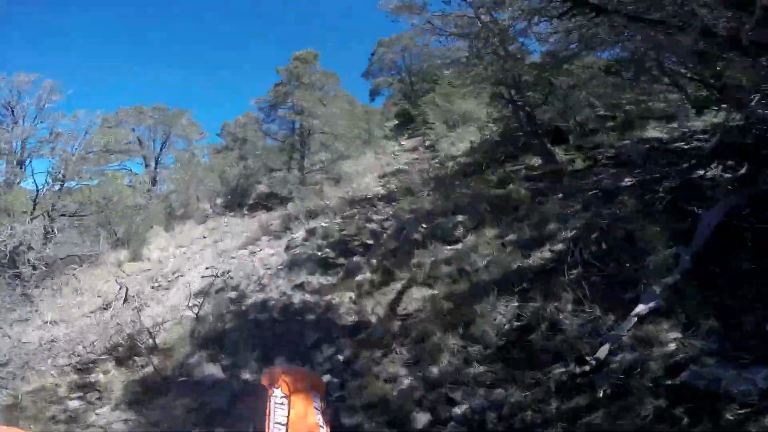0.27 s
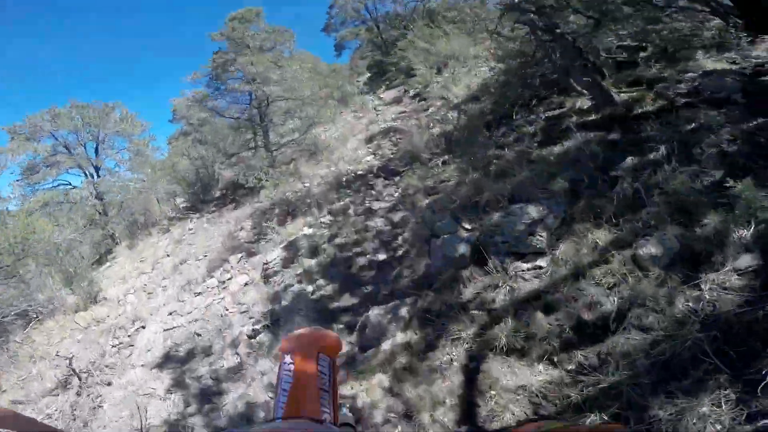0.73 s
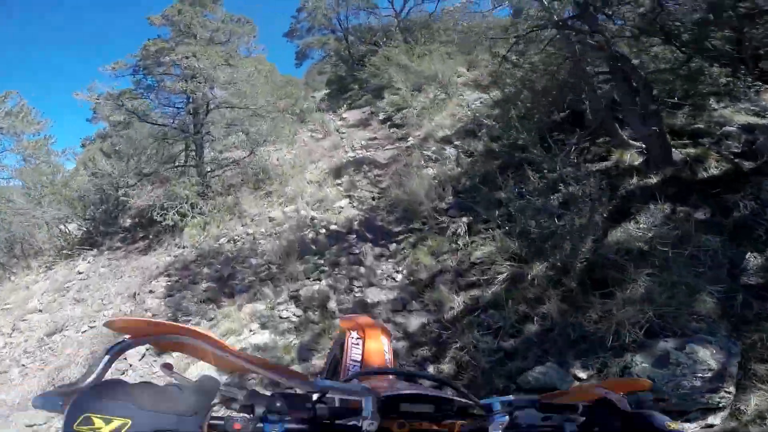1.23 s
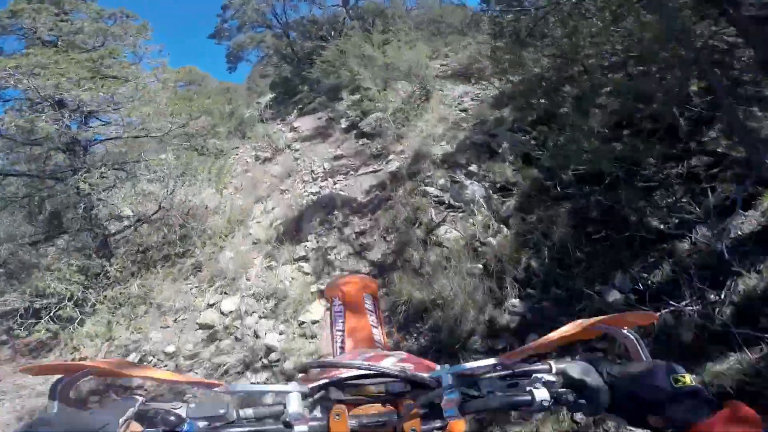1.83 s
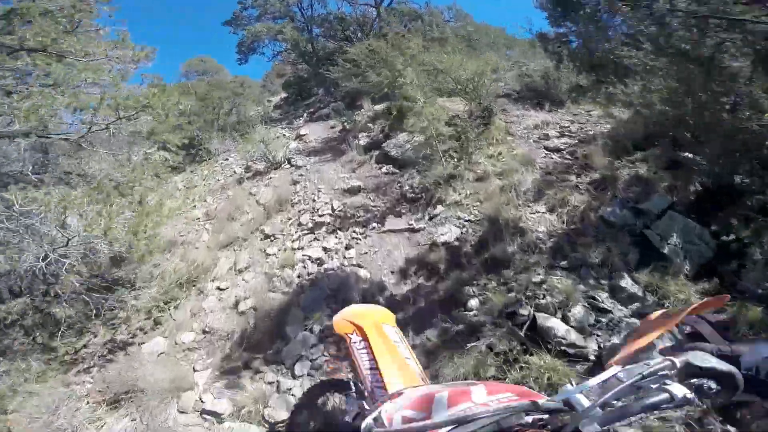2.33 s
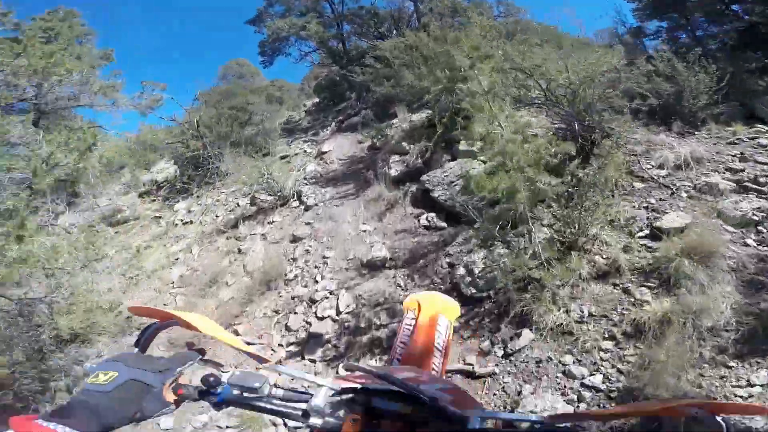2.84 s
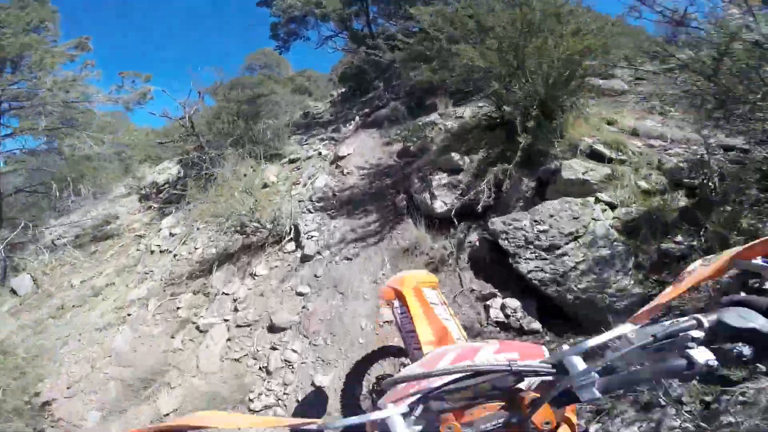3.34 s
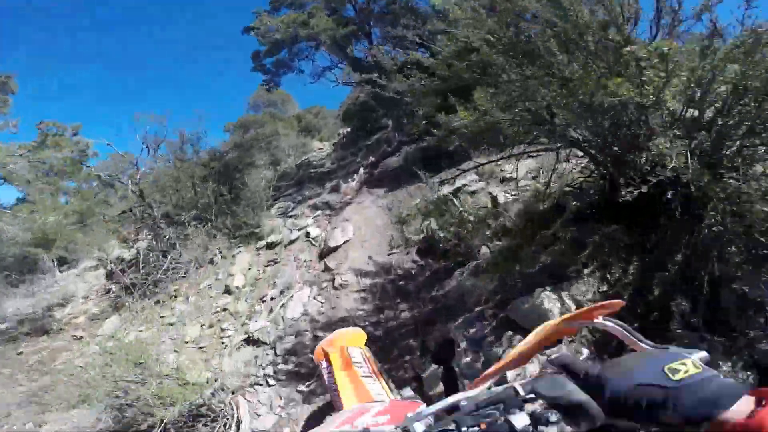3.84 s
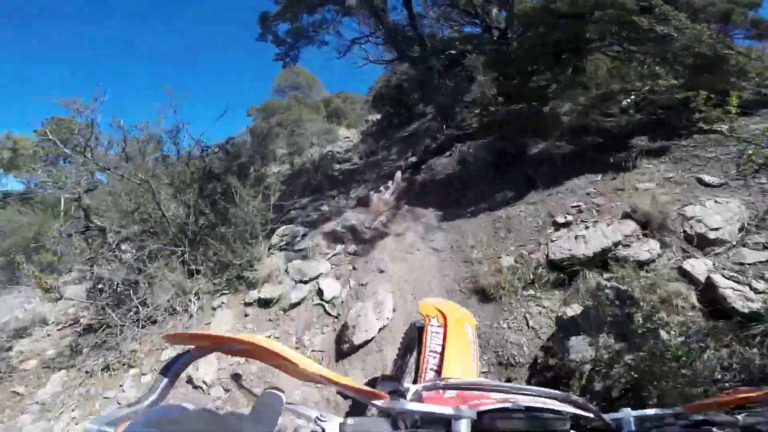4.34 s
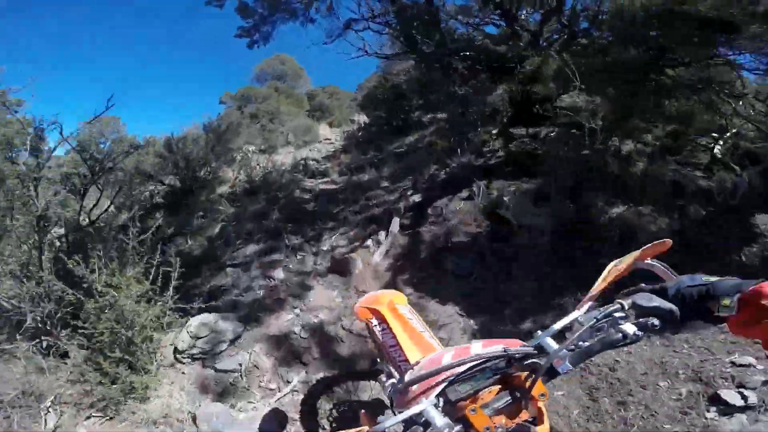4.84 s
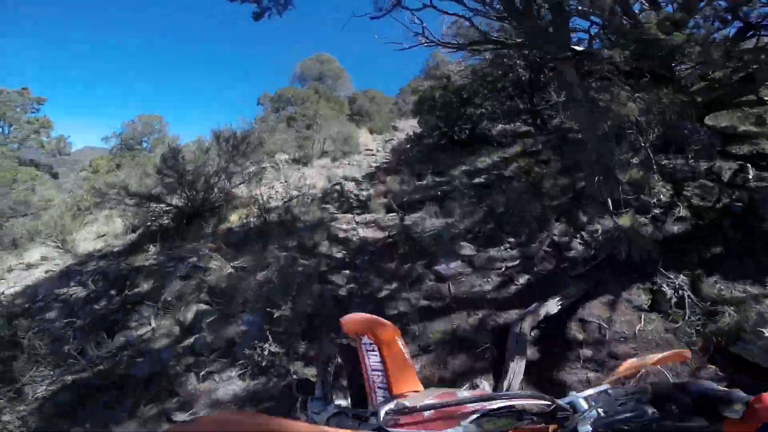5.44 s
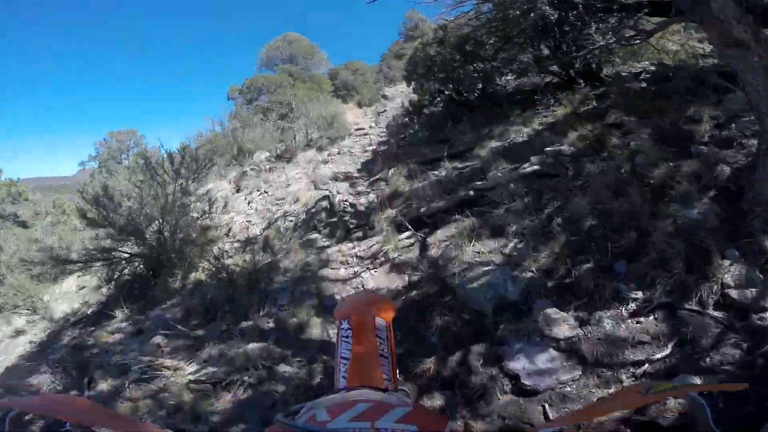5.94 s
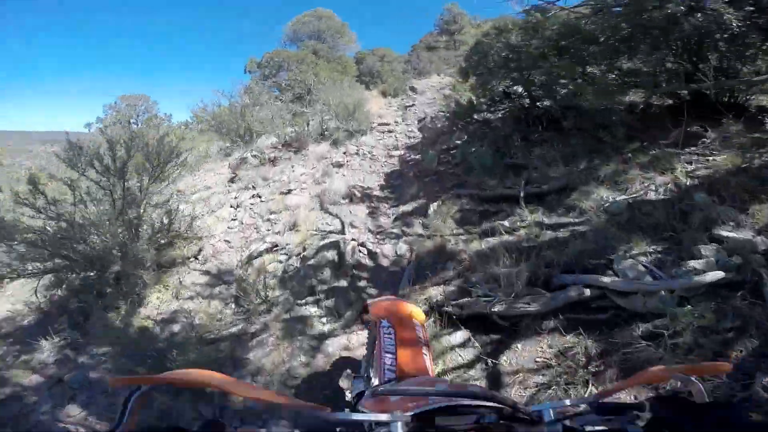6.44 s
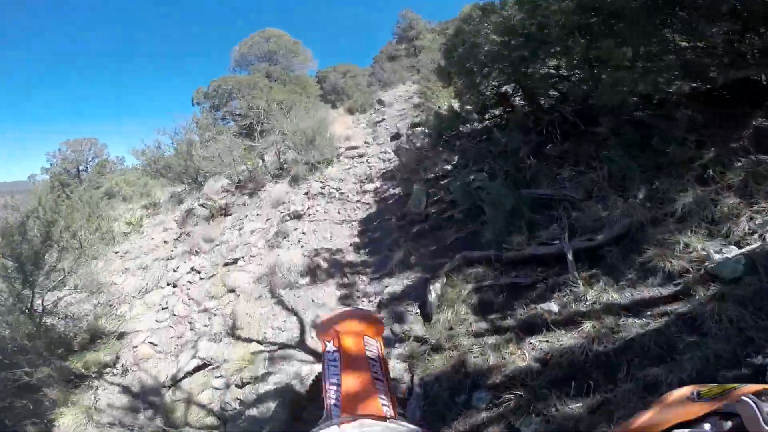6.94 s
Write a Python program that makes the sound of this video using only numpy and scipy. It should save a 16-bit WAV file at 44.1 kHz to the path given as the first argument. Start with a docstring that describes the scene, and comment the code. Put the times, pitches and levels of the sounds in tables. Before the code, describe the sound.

Close, raspy two-stroke motorcycle engine surges and sags uphill, popping as it picks up again, with clacks, thuds and a final rise in revs.

```python
"""A two-stroke dirt bike climbs a rocky slope in bursts of throttle, heard from the rider's helmet.
Each firing thumps through the exhaust, which booms, drones, growls and barks; gas rasps and the piston clatters in step.
Between bursts the engine coasts raggedly and catches with a pop; metal clacks and thuds, trail and twigs rustle.
One train of firing impulses drives filters for the exhaust, gas and piston; the gears are a phase-driven sine.
Clacks and pops are filtered blows, trail and twigs filtered noise, and a brief metallic singing two unsteady sines."""
import sys
import numpy as np
from scipy import signal
from scipy.fft import rfft, irfft, next_fast_len
from scipy.io import wavfile
from scipy.ndimage import uniform_filter1d, minimum_filter1d, map_coordinates

SR = 44100
rng = np.random.default_rng(int(sys.argv[2]) if len(sys.argv) > 2 else 0)


def pcm_store(signal):
    """Save signal as 16-bit PCM."""
    levels = np.round(np.clip(np.atleast_2d(signal), -1, 1) * 32767)
    wavfile.write(sys.argv[1], SR, levels.astype(np.int16).T)


N = 317079

# pipe's main resonance, broad when the engine runs freely: (frequency [Hz], relative level [dB])
DRONE_RESPONSE = [(60, -51), (135, -23), (175, -12.5), (210, -3), (238, 5), (272, 3), (300, 0), (335, -5.5),
                  (375, -13), (600, -48.5), (1500, -100)]


def amp(db):
    """Decibels to gain."""
    return 10 ** (np.asarray(db) / 20)


def unit(x):
    """Scale to rms 1."""
    return x / np.sqrt(np.mean(x ** 2) + 1e-20)


def even(x, size=3500):
    """Scale to rms 1 at every moment, over a few firings."""
    power = uniform_filter1d(uniform_filter1d(x ** 2, size), size)
    return x / np.sqrt(np.abs(power) + 1e-20)


def curves(rows):
    """One value per sample for each column after the time."""
    time_s, *columns = np.transpose(rows)
    return [np.interp(np.arange(N) / SR, time_s, column) for column in columns]


def swell(center_s, half_s):
    """A smooth Gaussian rise and fall around center_s."""
    return np.exp(-((np.arange(N) / SR - center_s) / half_s) ** 2)


def wobble(knots_per_s):
    """A smooth random curve, splined through normal random knots."""
    knots = rng.standard_normal(int(N * knots_per_s / SR) + 4)
    return map_coordinates(knots, [np.arange(N) * knots_per_s / SR])


def ring(x, response, spread_s_per_khz=0, size=16384):
    """Pass x through a causal minimum-phase body; the spread delays the highs."""
    hz, db = np.transpose(response)
    grid_hz = np.fft.rfftfreq(size, 1 / SR)
    log_gain = np.log(amp(np.interp(np.log(grid_hz + 1), np.log(hz), db)))
    # folding the cepstrum onto positive times gives minimum phase
    cepstrum = irfft(log_gain)
    cepstrum[1:size // 2] *= 2
    cepstrum[size // 2 + 1:] = 0
    chirp_rad = np.pi * spread_s_per_khz * grid_hz ** 2 / 1000
    impulse = irfft(np.exp(rfft(cepstrum) - 1j * chirp_rad))
    return signal.fftconvolve(x, impulse)[:len(x)]


def pulses(times_s, sizes):
    """Impulses, each shared between its two nearest samples."""
    at = np.clip(times_s * SR, 0, N - 2)
    i = at.astype(int)
    return np.bincount(i, sizes * (1 - at + i), N) + np.bincount(i + 1, sizes * (at - i), N)


def puffs(train, t60_s, steady):
    """Noise that flares at each impulse and dies down to a steady hiss."""
    t = np.arange(SR // 8) / SR
    flare = unit(signal.fftconvolve(train, amp(-60 * t / t60_s))[:N])
    return unit((flare + steady) * rng.standard_normal(N))


def bursts(times_s, peaks_db, response, attack_s, t60_s, noisy):
    """Short blows with a noisy wake into a body, each scaled to its peak level."""
    out, t = np.zeros(N + SR), np.arange(SR // 5) / SR
    for time_s, peak_db in zip(times_s, peaks_db):
        envelope = amp(-60 * t / t60_s) * (1 - np.exp(-t / attack_s))
        blow = noisy * rng.standard_normal(len(t)) * envelope + (t == 0)
        sound = ring(blow, response)
        out[round(time_s * SR):][:len(t)] += amp(peak_db) * sound / np.abs(sound).max()
    return out[:N]


def throttle():
    """Throttle closure (1 = ordinary coast), push [dB] from twists of the grip, and their extra growl and bark [dB]."""
    # rider rolls off: (shut [s], reopened [s], depth [1 = ordinary coast])
    roll_offs = [(0.031, 0.301, 0.81), (0.672, 0.711, 0.52), (1.02, 1.099, 0.44), (1.747, 1.813, 0.32),
                 (2.807, 2.955, 0.78), (3.529, 3.567, 0.53), (4.021, 4.187, 1.1), (4.905, 5.127, 1.25),
                 (6.235, 6.452, 1.39)]
    # grip twists over rocks: (time [s], half length [s], push [dB], extra growl [dB], extra bark [dB])
    twists = [(0.461, 0.17, 2, -2, 3), (0.619, 0.062, -0.5, 1.5, 7.5), (.932, 0.07, -3.1, 6, 6.5),
              (1.455, 0.097, 3.5, 0.5, 6.5), (1.684, 0.12, -0.3, -2, 2), (1.956, 0.072, 0.8, 0, 3),
              (2.465, 0.097, -3.5, 3.5, 3.5), (2.687, 0.093, 2, 5.5, 2.5), (3.168, 0.1, 3, 1.5, 2),
              (3.425, 0.064, 2, 0.5, 0), (3.774, 0.019, 7.5, 0, -2.5), (3.917, 0.018, 3, 0.5, 4.5),
              (4.34, 0.027, -1.5, 8, 7), (4.587, 0.19, 2.5, -3.5, 2.5), (4.763, 0.052, 3, 1.5, -0.5),
              (5.398, 0.078, -0.5, -9.5, 4.5), (5.564, 0.08, 0.5, 4, 8.5), (5.778, 0.058, -1, 4.5, 2),
              (5.978, 0.1, 1.8, 1, 5.5), (6.148, 0.035, 4, 2, 0), (6.69, 0.081, 3, 2, 2),
              (6.764, 0.037, 3, -5.5, 7), (6.87, 0.059, 1.5, 1.5, 5), (6.99, 0.038, 0.5, 2.5, 8),
              (7.113, .08, 3.5, 1, -1.5)]
    shut_s, open_s = 0.079, 0.12  # ramp lengths
    t = np.arange(N) / SR
    shut = np.zeros(N)
    for off_s, on_s, depth in roll_offs:
        closing = (t - off_s) / shut_s
        opening = 1 - (t - on_s) / open_s
        shut += depth * np.clip(np.minimum(closing, opening), 0, 1)
    push_db, growl_db, bark_db = sum(np.outer(levels_db, swell(s, half_s))
                                     for s, half_s, *levels_db in twists)
    return shut, push_db, growl_db, bark_db


def follow(shut, push_db, steady_db, coast_loss_db, db_per_push_db):
    """Level [dB] of one engine part: steady pull, less coasting loss, plus its share of the push."""
    return steady_db - coast_loss_db * shut + db_per_push_db * push_db


def firings(rate, coast):
    """One firing per crank turn, less regular in time and strength when coasting; returns a train maker."""
    at = np.flatnonzero(np.diff(np.floor(np.cumsum(rate) / SR - .02)))
    jitter_s = .00008 + .001 * coast[at]
    times_s = at / SR + jitter_s * rng.standard_normal(len(at))
    strength_db = (0.65 + 1.3 * coast[at]) * rng.standard_normal(len(at))
    strength = amp(strength_db) / np.sqrt(rate[at])

    def strokes(lag_s, scatter_db):
        """The firings as one part of the engine feels them."""
        return pulses(times_s + lag_s, strength * amp(scatter_db * rng.standard_normal(len(at))))

    return strokes


def slope_echoes(x, share, reach_s, sway_s, count=9):
    """Bounces off rocks and trunks fill the gaps between firings; their paths drift as the bike moves."""
    n, out = np.arange(N), x.copy()
    for k in range(count):
        delay_s = reach_s * (k + rng.uniform(.4, 1.4)) / count + sway_s * wobble(1.5)
        sign = rng.choice([-1, 1])
        out += sign * share / np.sqrt(count) * np.interp(n - delay_s * SR, n, x)
    return even(out)


def exhaust(strokes, rate, coast, grip):
    """Pressure pulses and their turbulent wake ring the pipe, whose chambers smear each into a rising chirp."""
    # pipe and silencer responses: (frequency [Hz], relative level [dB]); lugging is the drone at low revs
    boom_response = [(15, -67), (35, -13), (52, -4.5), (68, 4), (88, 2.5), (108, 0.5), (135, -11),
                     (220, -57), (500, -73.5)]
    lugging_response = [(60, -59), (140, -24.5), (195, -8), (235, -2.5), (258, 2), (276, 7), (300, -0.5),
                        (335, 2), (370, -8), (430, -25.5), (600, -44.5), (1500, -100)]
    growl_response = [(150, -35), (260, -46.5), (325, -8.5), (365, 4), (405, 2.5), (480, 1.5), (540, 4.5),
                      (620, -8), (800, -38.5), (2000, -108)]
    bark_response = [(250, -69.5), (450, -7), (540, -29.5), (600, 1.5), (670, 3.5), (715, 0), (780, -0.5),
                     (870, -14), (1050, -20.5), (1200, -61), (1800, -40.5), (4000, -69.5)]
    # level change with revs: (rate [firings/s], boom [dB], drone [dB])
    by_speed = [(43, 5.5, 1), (48.8, 2.5, 1.7), (58.5, -6, 0.36), (69.2, 0, 2.4), (86.6, 0.5, -6)]
    shut, push_db, extra_growl_db, extra_bark_db = grip
    speeds, boom_gain_db, drone_gain_db = np.transpose(by_speed)

    def pipe(response, lag_s, scatter_db, rough):
        """Mix clean pulses with noisy wake; the note cleans up as the revs rise."""
        train = strokes(lag_s, scatter_db)
        wake = unit(ring(puffs(train, t60_s=0.092, steady=0.36), response, spread_s_per_khz=0.0062))
        pulse = unit(ring(train, response, spread_s_per_khz=.01))
        wake_share = np.clip(rough * (50 / rate) ** 2 + .5 * coast, 0, .9)
        return np.sqrt(1 - wake_share) * pulse + np.sqrt(wake_share) * wake

    boom = even(pipe(boom_response, lag_s=0, scatter_db=1, rough=.08))
    boom_db = follow(shut, push_db, steady_db=-34, coast_loss_db=8.7, db_per_push_db=0.98)
    boom_db += np.interp(rate, speeds, boom_gain_db)

    free = np.clip((rate - 46) / 9, 0, 1)  # 0 = lugging, 1 = running freely
    lugging = pipe(lugging_response, lag_s=0, scatter_db=.5, rough=.05)
    running = pipe(DRONE_RESPONSE, lag_s=0, scatter_db=.5, rough=.05)
    drone = slope_echoes(free * running + (1 - free) * lugging, share=.38, reach_s=.021, sway_s=.0005)
    drone_db = follow(shut, push_db, steady_db=-17, coast_loss_db=11.7, db_per_push_db=0.95)
    drone_db += np.interp(rate, speeds, drone_gain_db)

    growl = pipe(growl_response, lag_s=.0035, scatter_db=.8, rough=.13)
    growl = slope_echoes(growl, share=1.2, reach_s=.021, sway_s=.0007)
    growl_db = follow(shut, push_db, steady_db=-21.5, coast_loss_db=9.4, db_per_push_db=1.28)
    growl_db += extra_growl_db

    bark = pipe(bark_response, lag_s=.002, scatter_db=1, rough=.19)
    bark = slope_echoes(bark, share=.75, reach_s=.017, sway_s=.0008)
    bark_db = follow(shut, push_db, steady_db=-20.5, coast_loss_db=9.3, db_per_push_db=0.58)
    bark_db += extra_bark_db
    return amp(boom_db) * boom + amp(drone_db) * drone + amp(growl_db) * growl + amp(bark_db) * bark


def gas_rasp(strokes, shut, push_db):
    """The sharp front of each gas pulse buzzes; the jet behind it hisses."""
    # gas outlet response: (frequency [Hz], relative level [dB])
    rasp_response = [(500, -16.5), (950, 4.5), (1080, 7.5), (1200, -0.5), (1440, 1), (1530, -6),
                     (1840, -2.5), (2020, -6), (2130, -11), (2320, -13), (2600, -13), (2750, -17),
                     (2920, -17), (3500, -32.5), (7000, -70)]
    gas = strokes(lag_s=0.00102, scatter_db=2.7)
    front = ring(gas, rasp_response, spread_s_per_khz=0.0054)
    buzz = slope_echoes(front, share=2.0, reach_s=.015, sway_s=0.00044)
    jet = unit(ring(puffs(gas, t60_s=0.026, steady=0.95), rasp_response))
    level_db = follow(shut, push_db, steady_db=-38, coast_loss_db=7.3, db_per_push_db=0.94)
    return amp(level_db) * unit(buzz + jet)


def gears(rate, shut, teeth=26):
    """The primary gear whines at its mesh rate, fuzzy from backlash, through the clutch cover."""
    mesh_rad = 2 * np.pi * teeth * np.cumsum(rate) / SR + 1.1 * wobble(80)
    # (frequency [Hz], relative level [dB])
    cover = [(600, -27.5), (1000, 6), (1300, -2), (1700, 0.5), (2000, -5.0), (2600, -11.5), (4000, -29)]
    level_db = -45.5 - 2.5 * shut  # almost as loud off the throttle
    return amp(level_db) * unit(ring(np.sin(mesh_rad), cover))


def cylinder_ping(train):
    """Piston blows ring the cylinder's few short modes."""
    # cylinder modes: (frequency [Hz], relative level [dB], t60 [s])
    cylinder_modes = [(1424, -9.5, 0.25), (1825, 8, 0.033), (2107, 1.5, .06), (2583, -11, 0.085),
                      (2870, -8.5, 0.078)]
    t = np.arange(SR // 8) / SR
    modes = sum(amp(db - 60 * t / t60_s) * np.sin(2 * np.pi * hz * t) for hz, db, t60_s in cylinder_modes)
    return unit(signal.fftconvolve(puffs(train, t60_s=0.024, steady=0.094), modes)[:N])


def piston(strokes, rate, shut, push_db):
    """The piston rocks over before the exhaust port opens: cylinder ping, louder at low revs, and metal clatter."""
    # engine metal response: (frequency [Hz], relative level [dB])
    metal_response = [(1500, -18.5), (2900, -16.5), (3500, -13.5), (4200, -11.5), (4650, -5), (5800, -0.5),
                      (6300, -10), (7100, -8.5), (8300, -22.5), (9000, -17.5), (10050, -15), (10800, -23.5),
                      (11700, -16.5), (13000, -29), (15200, -36)]
    # top end rattles harder under load: (time [s], half length [s], extra level [dB])
    rattles = [(1.387, .14, 4), (4.482, 0.25, 2)]
    slaps = strokes(lag_s=-0.0045, scatter_db=3.0)
    ping_db = follow(shut, push_db, steady_db=-48, coast_loss_db=7, db_per_push_db=0.11)  # at 50 firings/s
    ping = amp(ping_db) * (50 / rate) ** 1.9 * cylinder_ping(slaps)
    clatter_db = follow(shut, push_db, steady_db=-52, coast_loss_db=8.2, db_per_push_db=0.51)
    clatter_db += sum(db * swell(s, half_s) for s, half_s, db in rattles)
    clatter = unit(ring(puffs(slaps, t60_s=0.055, steady=.9), metal_response))
    return ping + amp(clatter_db) * clatter


def engine():
    """One train of firings drives exhaust, gas and piston; the gears follow the same crank speed."""
    # crank speed: (time [s], rate [firings/s])
    crank_speed = [(0.0, 52.8), (0.06, 56.7), (0.32, 40.8), (0.62, 48.1), (0.68, 59.7), (0.78, 47.2),
                   (0.99, 52.2), (1.15, 36.1), (1.49, 52.5), (1.56, 62.8), (1.66, 52.6), (1.88, 47.0),
                   (1.96, 55.4), (2.02, 46.8), (2.11, 56.2), (2.2, 51.3), (2.25, 58.9), (2.32, 53.5),
                   (2.38, 57.5), (2.56, 50.5), (2.76, 54.3), (2.79, 62.0), (2.82, 64.5), (2.91, 48.2),
                   (2.99, 43.7), (3.16, 55.2), (3.24, 70.3), (3.49, 61.6), (3.57, 49.4), (3.72, 54.0),
                   (3.78, 61.7), (3.86, 60.8), (3.92, 73.5), (3.96, 66.5), (4.04, 67.6), (4.12, 50.2),
                   (4.32, 45.5), (4.42, 58.3), (4.69, 57.2), (4.83, 61.7), (4.96, 52.7), (4.99, 43.5),
                   (5.2, 35.4), (5.28, 42.0), (5.61, 52.5), (5.73, 38.7), (5.89, 43.0), (6.02, 56.6),
                   (6.07, 53.1), (6.22, 67.6), (6.37, 44.5), (6.52, 44.5), (6.6, 51.9), (6.72, 79.1),
                   (6.8, 88.8), (6.95, 80.3), (7.09, 95.0), (7.19, 85.8)]
    rate, = curves(crank_speed)
    grip = throttle()
    shut, push_db = grip[:2]
    coast = np.clip(shut, 0, 1) ** 2  # raggedness of combustion
    strokes = firings(rate, coast)
    driven = exhaust(strokes, rate, coast, grip) + gas_rasp(strokes, shut, push_db)
    return driven + gears(rate, shut) + piston(strokes, rate, shut, push_db)


def trail():
    """Tyres grind over loose dirt and air brushes the helmet: low rumble that swells and sinks, fluttering noise."""
    # low rumble of ground and air: (time [s], level [dB])
    rumble_level = [(0, -32.5), (.5, -31), (1.3, -47), (1.8, -43.5), (4.9, -44), (5.4, -36.5), (5.9, -35.5),
                    (6.4, -51), (7.19, -43)]
    # rumble spectrum: (frequency [Hz], relative level [dB per Hz])
    rumble_spectrum = [(15, -9.5), (30, -5.5), (50, -3.5), (90, -8), (130, -4), (220, -21), (600, -66)]
    # tyres on dirt and moving air: (frequency [Hz], relative level [dB per Hz])
    dirt_spectrum = [(20, -9.5), (50, -17), (130, -7), (270, -11), (420, -7), (700, 2), (1100, -9.5),
                     (2000, -30.5), (3500, -50), (7000, -44.5), (15000, -66.5)]
    rumble_db, = curves(rumble_level)
    rumble = amp(rumble_db) * unit(ring(rng.standard_normal(N), rumble_spectrum))
    dirt_db = -33.5 + 3.8 * wobble(9.5)
    return rumble + amp(dirt_db) * unit(ring(rng.standard_normal(N), dirt_spectrum))


def brushes():
    """Twigs and grit rustle past in short swells of tiny ticks."""
    # brushes against twigs and loose grit: (time [s], half length [s], level [dB])
    passes = [(0.013, 0.099, -54), (2.78, 0.046, -58), (3.162, 0.21, -59.5), (3.915, .08, -60),
              (4.423, 0.078, -60.5)]
    # twig spectrum: (frequency [Hz], relative level [dB])
    twig_spectrum = [(2000, -17), (3600, -2), (7000, -0.5), (9500, -2), (12500, -2), (15000, -15)]
    envelope = sum(amp(db) * swell(s, half_s) for s, half_s, db in passes)
    ticks = rng.standard_normal(N) * amp(4 * wobble(550))
    return envelope * unit(ring(ticks, twig_spectrum))


def clacks():
    """Chain slaps and hollow thuds; those near 4.13-4.24 s are probably lone engine firings."""
    # blows: (time [s], bright clack peak before the 2.5 dB lift [dB], hollow thud peak [dB])
    blows = [(0.1212, -42.5, -11.5), (0.2234, -42.5, -12.5), (2.9053, -48, -50), (2.9563, -44, -17.5),
             (4.129, -45.5, -17), (4.1974, -49.5, -14), (4.2444, -60, -9.5), (4.957, -46, -41),
             (5.0315, -47.5, -17.5), (5.1083, -43.5, -17), (6.3205, -47.5, -17), (6.4033, -55, -31),
             (6.5051, -47, -17.5)]
    # bright and hollow responses, as of chain and chassis: (frequency [Hz], relative level [dB])
    bright_response = [(800, -9.5), (1800, -2.5), (2800, -3.5), (3600, -4), (5500, 4), (7200, 1.5),
                       (8300, -15), (10000, -3.5), (12000, -12), (15000, -19.5)]
    hollow_response = [(100, -38), (270, 4), (430, -5), (700, 12.5), (950, -4), (1500, -26), (4000, -54.5)]
    s, bright_db, hollow_db = np.transpose(blows)
    bright = bursts(s, bright_db + 2.5, bright_response, attack_s=.002, t60_s=0.076, noisy=0.81)
    hollow = bursts(s, hollow_db, hollow_response, attack_s=0.003, t60_s=0.09, noisy=0.97)
    return bright + hollow


def pops():
    """Unburnt mixture lights all at once as the engine catches, ringing the pipe."""
    # lone hard firings: (time [s], peak before the 2 dB lift [dB])
    hard_firings = [(0.124, -16), (0.37, -18), (2.984, -6.5), (4.276, -7.5), (5.178, -8.5), (6.481, -8.5)]
    s, peak_db = np.transpose(hard_firings)
    return bursts(s, peak_db + 2, DRONE_RESPONSE, attack_s=0.0042, t60_s=0.12, noisy=0.055)


def singing():
    """Rubbed metal, perhaps a brake disc, sings briefly in two unsteady tones."""
    # tones: (frequency [Hz], relative level [dB])
    disc_tones = [(2620, 0), (3230, -11)]
    center_s, half_s, level_db = .57, 0.13, -52.5
    t = np.arange(N) / SR
    tones = np.zeros(N)
    for hz, tone_db in disc_tones:
        gain = amp(tone_db + 3 * wobble(40))
        tones += gain * np.sin(2 * np.pi * hz * t + 1.3 * wobble(70))
    return amp(level_db) * swell(center_s, half_s) * tones


def scene():
    """Bike and trail at one microphone."""
    return (engine() + pops() + clacks() + brushes() + singing() + trail())[None]


def record(dry, ceiling=.8, size=221, top_hz=15250):
    """A limiter holds the peaks down; a sharp band limit removes everything from top_hz up."""
    needed_gain = np.minimum(1, ceiling / (np.abs(dry) + 1e-9))
    limited = dry * uniform_filter1d(minimum_filter1d(needed_gain, size), size)
    m = next_fast_len(N + SR // 4)
    passed = np.fft.rfftfreq(m, 1 / SR) < top_hz
    return irfft(rfft(limited, m) * passed, m)[..., :N]


dry = scene()
out = record(dry)
pcm_store(out)
```